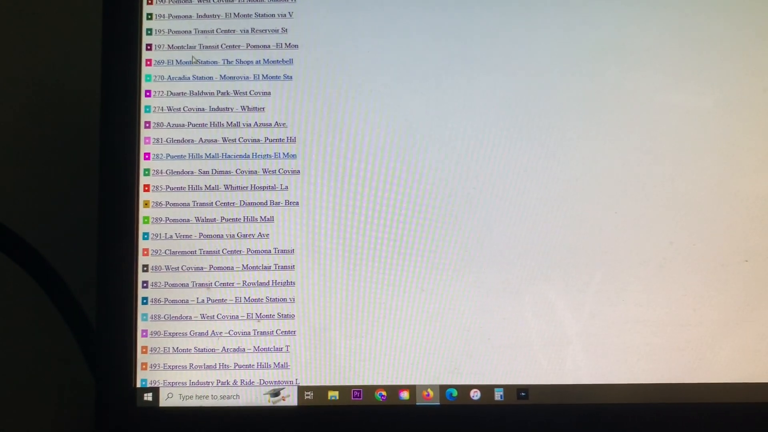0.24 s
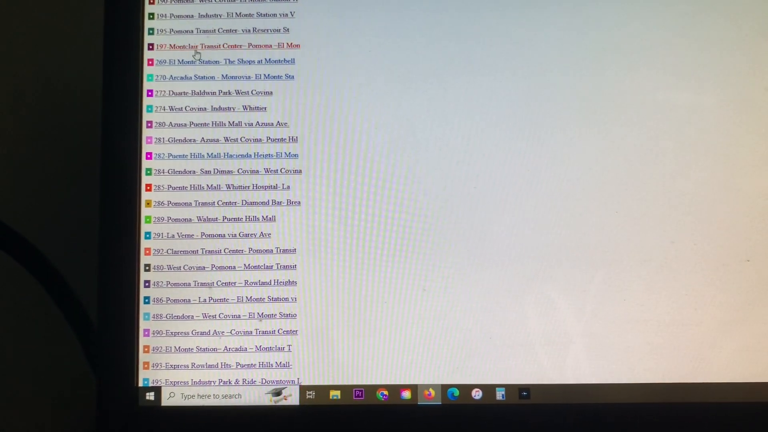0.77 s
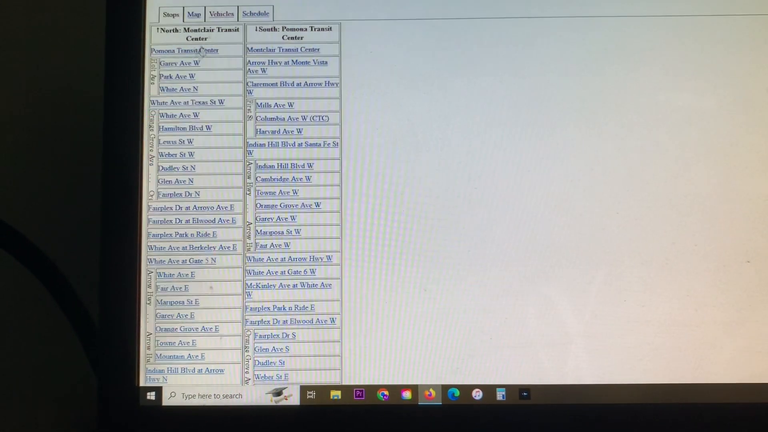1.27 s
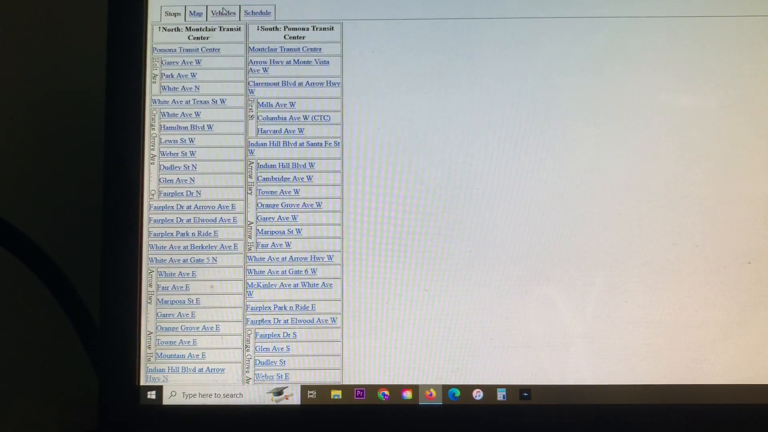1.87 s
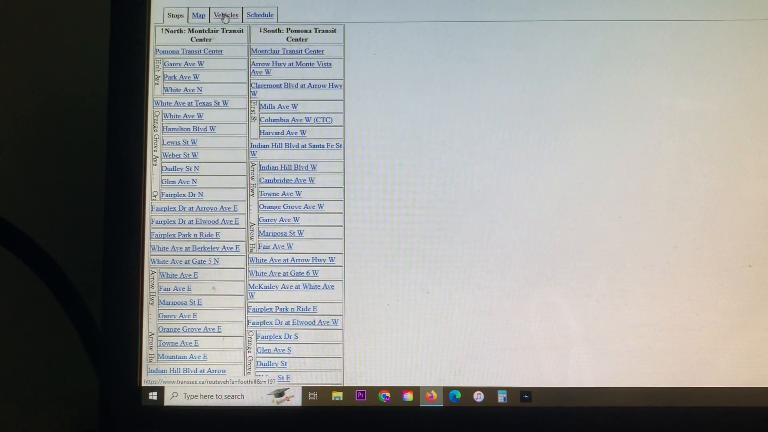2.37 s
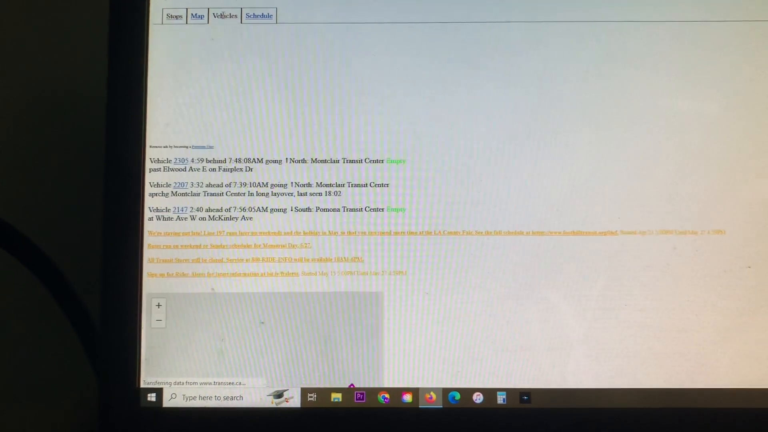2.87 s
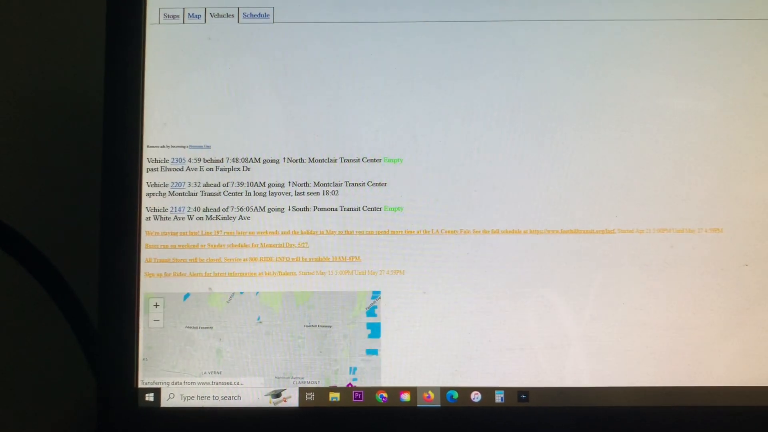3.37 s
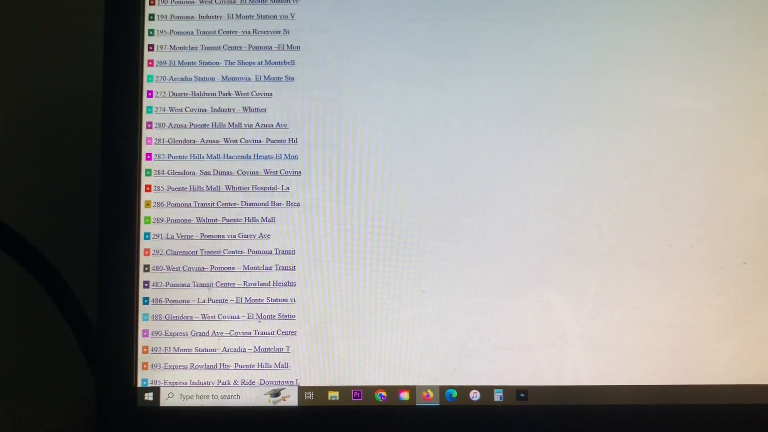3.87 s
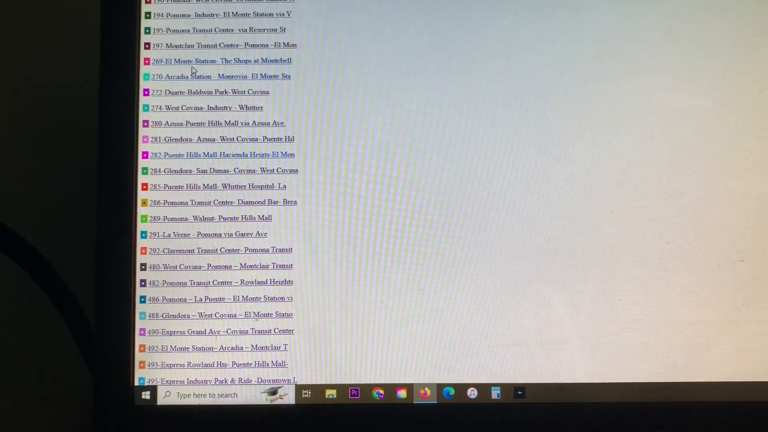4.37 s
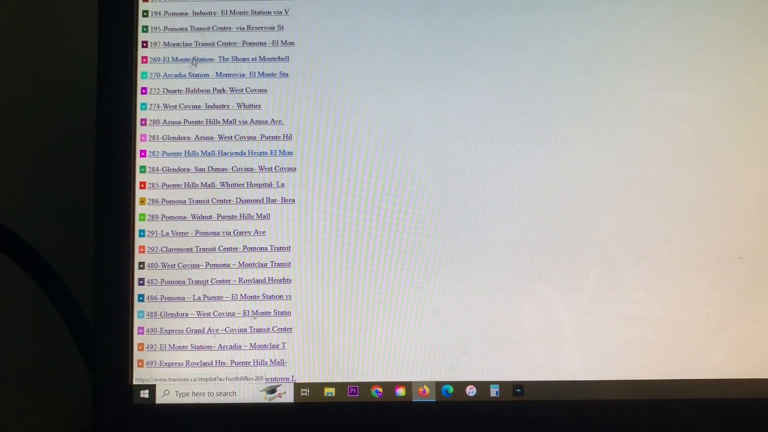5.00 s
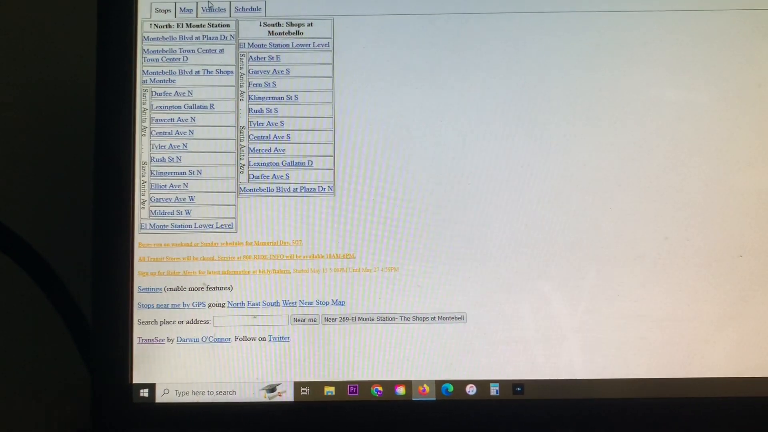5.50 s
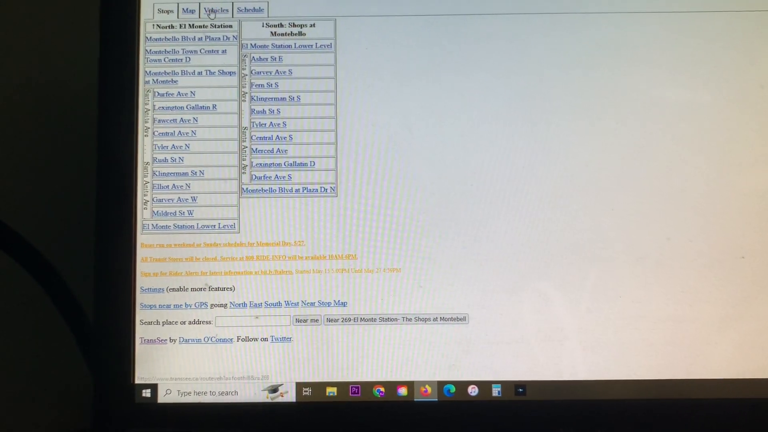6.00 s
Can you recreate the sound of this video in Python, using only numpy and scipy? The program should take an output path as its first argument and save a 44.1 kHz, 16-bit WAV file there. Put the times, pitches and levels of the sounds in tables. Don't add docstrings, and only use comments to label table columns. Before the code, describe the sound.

A low, nearly unwavering electrical hum runs from start to end, with soft fan rumble that swells in slow gusts, a thin high whine and light hiss. Over it, a computer mouse close by clicks in a small room. Each click is a dry, bright double snap: a press, then about 0.08 s later a louder, springier release, with a short room tail. Clicks fall at 0.3 and 0.65 s, then a pause with a barely audible glide around 1.15 s. Three follow at 1.7, 2.0 and 2.3 s. Faint nudges on the pad come near 2.8, 3.0 and 3.3 s, then a rapid pair at 3.55 and 3.65 s. A single click lands at 4.45 s, another soft glide at 5.3 s, and two last clicks at 5.5 and 5.7 s. Only hum and air remain until about 6.2 s.

```python
import sys
import numpy as np
from scipy import signal
from scipy.fft import rfft, irfft
from scipy.io import wavfile
from scipy.ndimage import uniform_filter1d

SR = 44100
rng = np.random.default_rng(int(sys.argv[2]) if len(sys.argv) > 2 else 0)


def level_to_linear(level):
    exponent = np.asarray(level, float) / 20
    return 10 ** exponent


def materialize(psi):
    bounded = np.clip(np.atleast_2d(psi).T, -1, 1)
    quanta = np.round(bounded * 32767).astype(np.int16)
    wavfile.write(sys.argv[1], SR, quanta)


N = 275625
HZ = np.fft.rfftfreq(N, 1 / SR)


def on_log(table, hz):
    f, v = np.transpose(table)
    return np.interp(np.log(np.maximum(hz, 1)), np.log(f), v)


def level(x, db):
    return x * level_to_linear(db) / np.sqrt(np.mean(x ** 2))


def walk(rate):
    hold = int(SR / rate)
    steps = np.repeat(rng.standard_normal(N // hold + 1), hold)
    return uniform_filter1d(uniform_filter1d(steps, hold), hold)[:N]


# frequency in Hz, share of power common to both (0 to 1).
PORT_LIKENESS = [(30, 0.99), (100, 0.76), (350, 1), (700, 0.6), (1000, 0.3), (1700, 0.091), (5500, 0.16),
                 (7000, 0.54), (8500, 0.46), (10000, 1), (15000, 0.93)]


def pair(gain):
    share = np.clip(on_log(PORT_LIKENESS, HZ), 0, 1)
    common, *own = rfft(rng.standard_normal((3, N)))
    return irfft(gain * (np.sqrt(share) * common + np.sqrt(1 - share) * np.array(own)), N)


def resonance(hz, width, db):
    return level(pair(1 / (1 + (2 * (HZ - hz) / width) ** 2)), db)


# level in dB, for shell, spring, sizzle and crack in turn.
DIRECT_LEFT_DB = [-.6, -7.5, .2, 0]
ROOM_SEND_DB = [-6, -10, -15.5, 5]
ROOM_SEND_LEFT_DB = [1, -7.5, -0.5, 0.5]


def mouse():
    tracks = presses() + releases()
    direct = np.array([level_to_linear(np.array(DIRECT_LEFT_DB)) @ tracks, tracks.sum(axis=0)])
    left_right_db = np.array([ROOM_SEND_LEFT_DB, np.zeros(4)])
    send = level_to_linear(np.array(ROOM_SEND_DB) + left_right_db) @ tracks
    return direct + signal.fftconvolve(send, room(), axes=1)[:, :N]


# start in seconds, level in dB, shell (0.7-7.6 kHz) and sizzle (over 10 kHz) in dB
PRESS_EVENTS = [(0.2881, -42, -10.5, -9.5), (0.6559, -40, -11.5, -10.5), (1.7071, -42.5, -12, -8),
                (2.011, -41, -15, -11), (2.3213, -42, -12, -9), (3.5409, -44.5, -8, -10),
                (3.659, -41, -14.5, -7.5), (4.4438, -41, -13, -8), (5.4826, -44, -8.5, -8),
                (5.7039, -42, -14.5, -7)]
# start in ms, length in ms, level in dB.
PRESS_BOUNCES = [
    (0, 1.8, 14.5),
    (1.702, 1, -15.5),
]
# frequency in Hz, level of the ring in dB, t60 in seconds.
PRESS_RINGS = [
    [(710, -11.5, 0.0053), (1206, -11, 0.011), (2293, -8, 0.045), (2810, -8, 0.0056), (3532, -4, 0.011),
     (4140, -6.5, 0.0021), (4710, -7, 0.0055), (5720, -2, 0.005), (6140, -4, 0.005), (7610, 0.5, 0.003)],
    [(8460, -1.5, 0.0056), (8870, 3, 0.0045), (8950, -20, .004)],
    [(11100, -2, 0.0031), (11580, -29, 0.0038), (13100, -1.5, 0.0042), (12300, -7, 0.0037),
     (14500, -11, 0.0025), (14600, -7, 0.004), (15400, -9, 0.0031)],
]
# frequency in Hz, level in dB.
PRESS_CRACK_COLOUR = [(400, -11), (800, -4.5), (1500, -7.5), (2600, -39), (3500, 3), (5000, -8.5),
                      (7500, -8), (8700, -3.5), (10000, -8.5), (14000, -14.5), (16000, -22)]


def presses():
    return snaps(PRESS_EVENTS, PRESS_BOUNCES, PRESS_RINGS, PRESS_CRACK_COLOUR)


# start in seconds, level in dB, shell (0.8-7.5 kHz) and sizzle (over 10 kHz) in dB
RELEASE_EVENTS = [(0.3679, -37.5, -17, -8), (0.7368, -36, -17.5, -12), (1.8117, -40, -14.5, -6),
                  (2.082, -40, -13.5, -4), (2.3833, -38, -17, -8), (3.6099, -39, -15.2, -7),
                  (3.7205, -37, -13, -10), (4.5243, -38, -14.5, -7.5), (5.552, -40.5, -12.5, -6.5),
                  (5.7893, -38, -14, -5.5)]
# start in ms, length in ms, level in dB.
RELEASE_BOUNCES = [
    (0, 1.8, 8),
    (1.2, 1.3, -13.5),
    (2.901, 0.56, -20),
]
# frequency in Hz, level of the ring in dB, t60 in seconds.
RELEASE_RINGS = [
    [(824, -8.5, 0.012), (1520, -14, 0.013), (2194, -9, 0.0077), (3730, -11, 0.0058), (4570, -1, 0.0071),
     (5240, -6.5, 0.0064), (6450, -3, 0.033), (7490, 1, 0.0019)],
    [(8200, -27, 0.0031), (8460, 3, 0.0078), (9105, -1, .004), (10620, -7, 0.0026)],
    [(11870, 3, 0.008), (10940, 5.5, 0.004), (13700, 3, 0.0012), (13600, 4.5, 0.0013), (14400, 2.5, 0.0043),
     (14800, 2, 0.0054), (16100, -10.5, 0.0043)],
]
# frequency in Hz, level in dB.
RELEASE_CRACK_COLOUR = [(400, -24), (900, -6.5), (2600, -19.5), (4400, -5), (7000, -7), (8600, -0.5),
                        (10000, -6.5), (14000, -7.5), (15800, -13)]


def releases():
    return snaps(RELEASE_EVENTS, RELEASE_BOUNCES, RELEASE_RINGS, RELEASE_CRACK_COLOUR)


def snaps(events, bounces, modes, crack_colour, size=220):
    wander_ms, knock_ms, crack_db = 0.1, 0.022, -15.5
    lead = 8
    ms = np.arange(size) * 1000 / SR
    habit = rng.uniform(0, 2 * np.pi, (3, 10))
    colour = level_to_linear(on_log(crack_colour, np.fft.rfftfreq(2 * size, 1 / SR)))
    out = np.zeros((4, N + 2 * SR))
    for s, db, shell_db, sizzle_db in events:
        grit = rng.standard_normal(size)
        slips = rng.standard_normal(len(bounces))
        extras = rng.standard_normal((3, 10))
        phases = habit + 0.79 * rng.standard_normal((3, 10))
        swell, knocks = 0, 0
        for (start, length, bounce_db), slip in zip(bounces, slips):
            late = wander_ms * slip * (start > 0)
            x = np.clip((ms - start - late) / length, 0, 1)
            swell = swell + level_to_linear(bounce_db) * np.sqrt(np.abs(np.sin(np.pi * x ** 0.35)))
            knocks = knocks + level_to_linear(bounce_db) * (x > 0) * np.exp(-x * length / knock_ms)
        sounds = [rings(swell, grit, *part) for part in zip(modes, extras, phases)]
        burst = knocks * (1 + 0.5 * grit) * np.cos(ms * 55)
        burst = np.roll(np.pad(burst, (0, size)), lead)
        sounds.append(irfft(rfft(burst) * colour))
        i = int(s * SR) - lead
        for track, sound, part_db in zip(out, sounds, (shell_db, 0, sizzle_db, crack_db)):
            gain = level_to_linear(db + part_db) / np.sqrt(np.mean(sound[:size] ** 2))
            track[i:i + len(sound)] += sound * gain
    return out[:, :N]


def rings(swell, grit, modes, extras, phases, size=900):
    scatter_db, rough = 2.5, 1.9
    t = np.arange(size) / SR
    out = 0
    for (hz, db, t60), extra, phase in zip(modes, extras, phases):
        pump = np.sin(2 * np.pi * hz * (1 + 0.0058 * extra) * t[:len(swell)] + phase)
        force = swell * (pump + rough * grit)
        decay = (1 - np.exp(-t * hz / 3)) * np.exp(-np.log(1000) * t / t60)
        ring = np.convolve(force, decay * np.sin(2 * np.pi * hz * t))
        out = out + level(ring, db + scatter_db * extra)
    return out


# delay in ms, spread in ms, level in dB over the tail
TAIL_SWELLS = [
    (4.66, 1.1, 1),
    (8.7, 1.8, 3.5),
    (16, 1.3, -3.5),
    (22.4, 0.79, -2),
]
# frequency in Hz, t60 in seconds.
TAIL_DECAY = [(500, 0.56), (2000, 0.18), (5000, 0.26), (9000, 0.23), (12000, 0.15), (15000, 0.12),
              (15900, 0.04)]


def room(size=16384):
    hz, s, z = signal.stft(pair(1)[:, :size], SR, nperseg=128)
    fade = level_to_linear(-60 * s / on_log(TAIL_DECAY, hz)[:, None])
    tail = signal.istft(z * fade, SR, nperseg=128)[1][:, :size]
    ms = np.arange(size) * 1000 / SR
    tail *= np.clip((ms - 1.2) / 3.3, 0, 1)
    tail *= level_to_linear(sum(db * np.exp(-((ms - at) / spread) ** 2) for at, spread, db in TAIL_SWELLS))
    return tail / np.sqrt(np.sum(tail ** 2, axis=1, keepdims=True))


# middle in seconds, half length in seconds, level in dB.
GLIDES = [
    (1.15, 0.21, -86),
    (1.503, .12, -85),
    (2.797, .07, -82.5),
    (2.963, .07, -81.5),
    (3.273, .06, -85),
    (4.148, 0.14, -87.5),
    (5.297, 0.16, -85),
]
# frequency in Hz, width in Hz, level in dB.
DRAG_RINGS = [
    (1180, 350, 0.5),
    (1780, 250, -7.5),
    (600, 120, -2),
]


def slides():
    t = np.arange(N) / SR
    drag = sum(level_to_linear(db) * np.exp(-((t - s) / half) ** 2) for s, half, db in GLIDES)
    return drag * level_to_linear(3 * walk(30)) * sum(resonance(*mode) for mode in DRAG_RINGS)


def hum():
    hum_hz, hum_db, left_db = 119.95, -44.3, 0.8
    tone = np.sqrt(2) * np.sin(2 * np.pi * hum_hz * np.arange(N) / SR + 0.1 * walk(1.8))
    return tone * level_to_linear(hum_db + 0.15 * walk(2.5) + np.array([[left_db], [0]]))


def air():
    return rumble() + hiss() + case() + whine()


# time in seconds, flow in dB about its mean.
FAN_FLOW = [(0, -3), (.45, 0.6), (1.4, -1.6), (2.0, 0.2), (2.7, -0.9), (3.15, -1.2), (3.5, 0.8),
            (4.1, -2.6), (4.9, -0.1), (5.35, -2.1), (5.7, -1), (6.25, -1)]


def flow():
    return np.interp(np.arange(N) / SR, *np.transpose(FAN_FLOW))


# frequency in Hz, level in dB per Hz.
RUMBLE_COLOUR = [(18, -105), (30, -90), (50, -77.5), (70, -83.5), (100, -77.5), (160, -86), (250, -89.5),
                 (340, -94), (450, -101), (700, -113), (2000, -150)]


def rumble():
    colour = level_to_linear(on_log(RUMBLE_COLOUR, HZ)) * np.sqrt(SR / 2)
    deep = 1 / (1 + (HZ / 90) ** 8)
    gusty = pair(colour * np.sqrt(deep)) * level_to_linear(gusts())
    return gusty + pair(colour * np.sqrt(1 - deep)) * level_to_linear(1.1 * flow())


# peak in seconds, swell in dB, length in seconds.
GUST_SWELLS = [
    (0.0, 6, 0.075),
    (0.72, 10, 0.21),
    (1.45, 5, 0.21),
    (2.0, 5, 0.48),
    (2.55, 9.5, 0.19),
    (3.0, 9, .12),
    (3.35, 8, 0.41),
    (5.2, 3, .15),
]


def gusts():
    calm_db, rise_share = -4.5, 0.28
    t = np.arange(N) / SR
    swell = calm_db
    for s, db, length in GUST_SWELLS:
        side = length * np.where(t < s, rise_share, 1)
        swell = swell + db * np.exp(-((t - s) / side) ** 2)
    return swell


# frequency in Hz, width in Hz, level in dB.
CASE_RINGS = [(204, 3.2, -79.5), (255.6, 14, -72), (333, 28, -75), (584, 12, -88), (1280, 170, -92.5),
              (12060, 330, -104), (1814, 69, -100)]


def case():
    return sum(resonance(*mode) * level_to_linear(1.1 * flow() + 3.4 * walk(6)) for mode in CASE_RINGS)


# frequency in Hz, width in Hz, level in dB.
WHINE_RING = (3865, 430, -82)


def whine():
    return resonance(*WHINE_RING) * level_to_linear(0.9 * flow() + 2.5 * walk(18) + 1.6 * walk(3.98))


# frequency in Hz, level in dB per Hz.
HISS_COLOUR = [(300, -105), (600, -105), (1000, -111), (1500, -114), (2500, -119), (3300, -120),
               (4600, -120), (6000, -123), (8000, -124), (10000, -123), (12000, -122), (14000, -125),
               (15300, -127), (15900, -150)]


def hiss():
    colour = level_to_linear(on_log(HISS_COLOUR, HZ)) * np.sqrt(SR / 2)
    low = 1 / (1 + (HZ / 1800) ** 4)
    rush = pair(colour * np.sqrt(low)) * level_to_linear(0.67 * flow() + 2 * walk(24.92))
    return rush + pair(colour * np.sqrt(1 - low)) * level_to_linear(0.7 * walk(8))


def scene():
    lag = 13
    left, right = mouse() + slides() + hum() + air()
    left = np.pad(left, (lag, 0), mode="reflect", reflect_type="odd")[:N]
    return np.array([left, right])


def low_pass(x):
    return signal.sosfilt(signal.butter(12, 16530, fs=SR, output="sos"), x)


def record(dry):
    top_cut = signal.ellip(7, 0.3, 60, 16020, fs=SR, output="sos")
    mix = signal.sosfilt(top_cut, dry)
    return low_pass(mix)


dry = scene()
out = record(dry)
materialize(out)
```